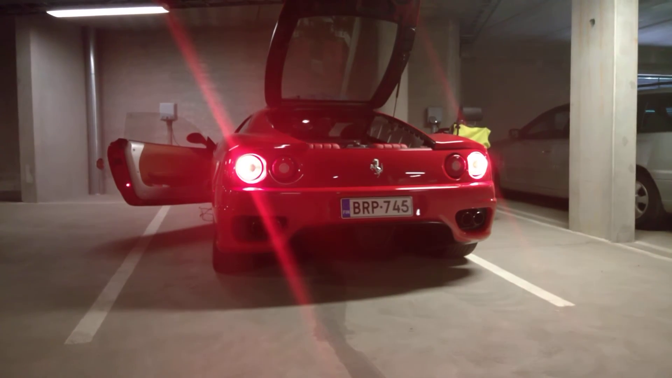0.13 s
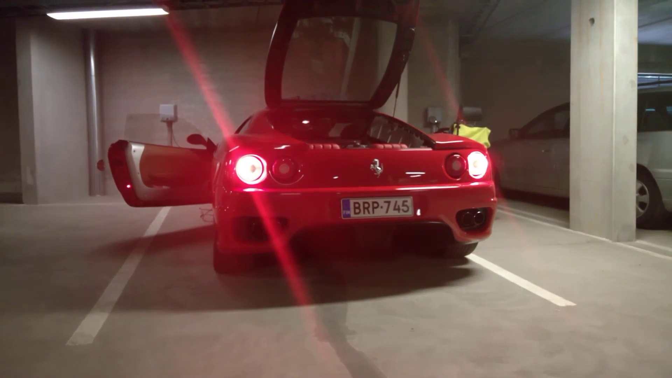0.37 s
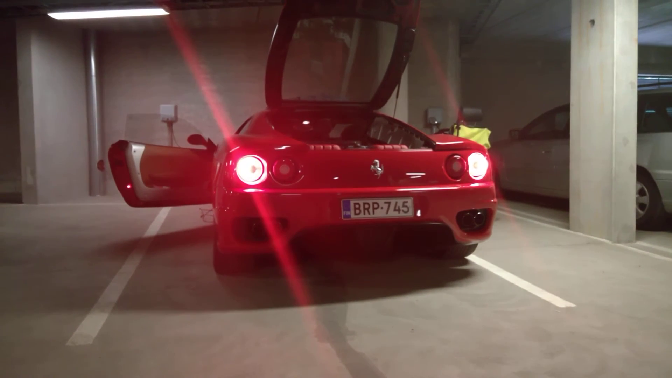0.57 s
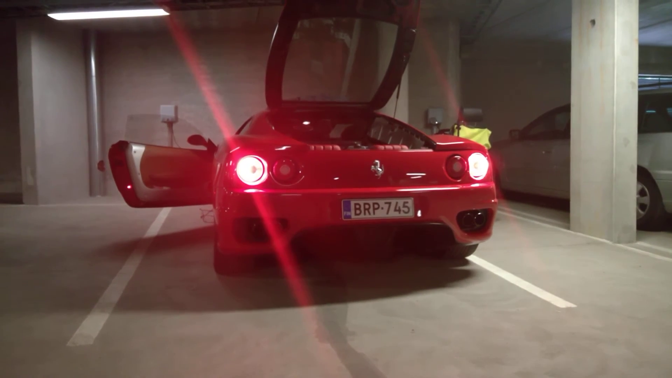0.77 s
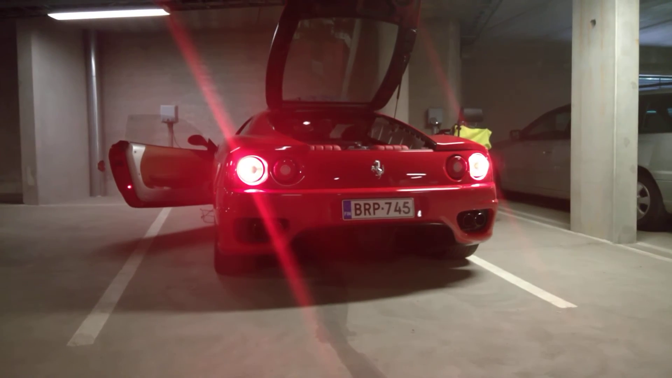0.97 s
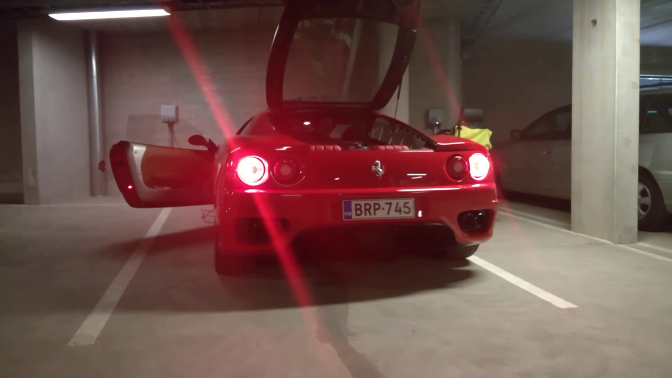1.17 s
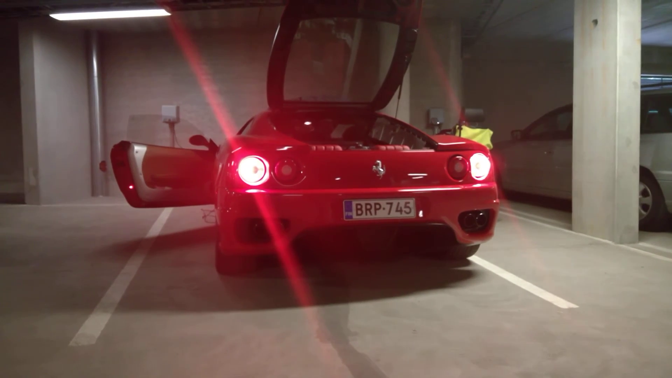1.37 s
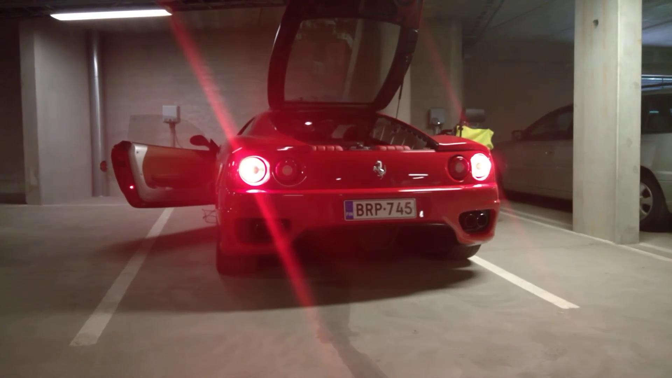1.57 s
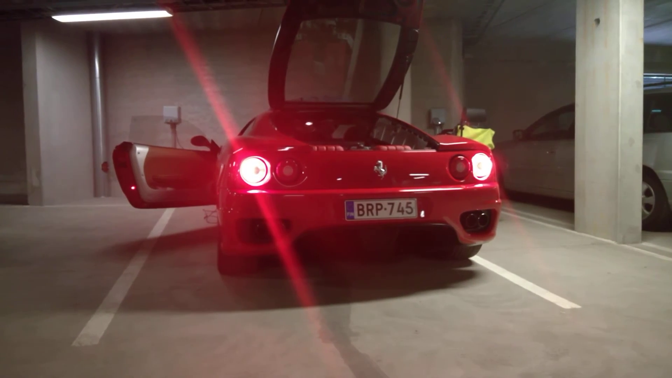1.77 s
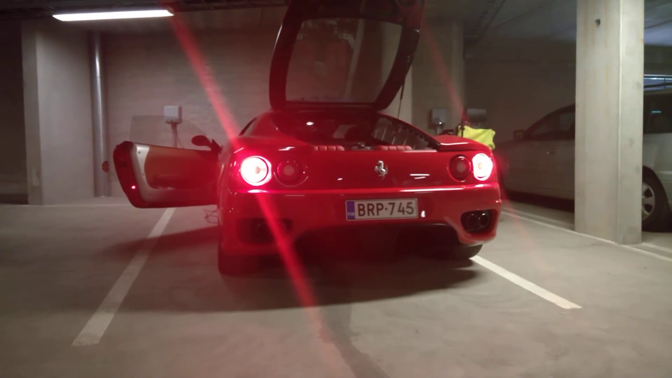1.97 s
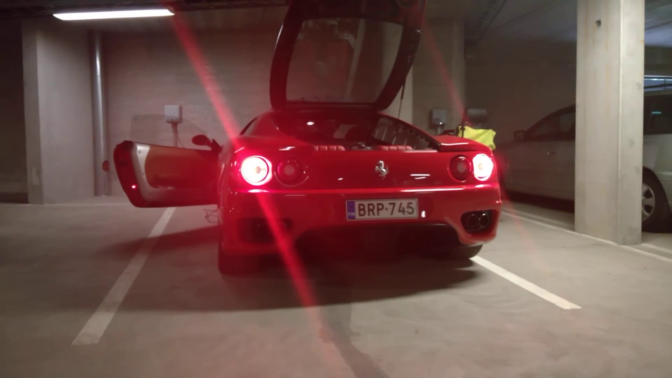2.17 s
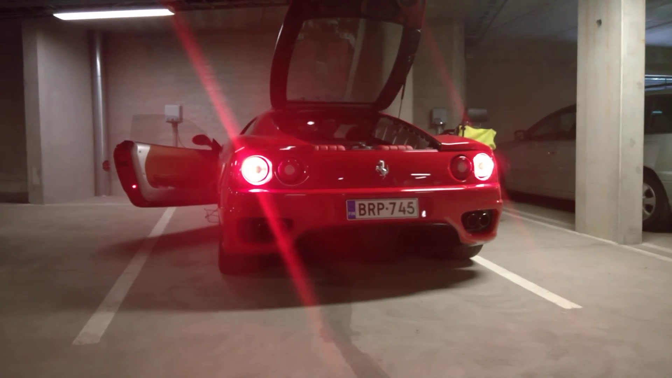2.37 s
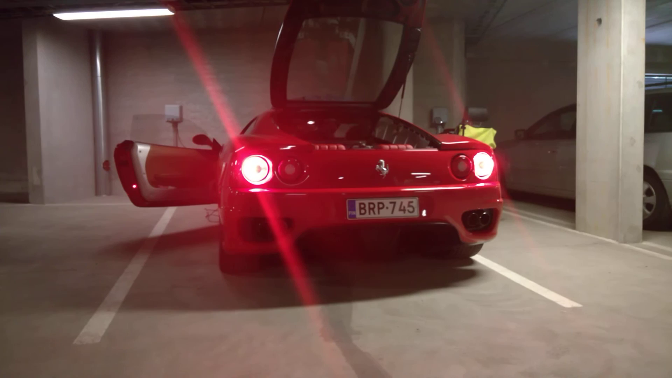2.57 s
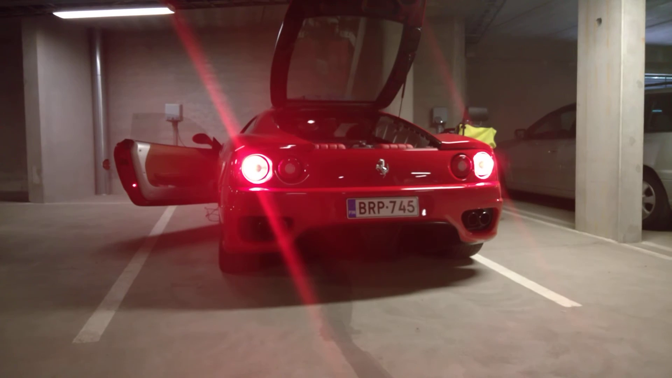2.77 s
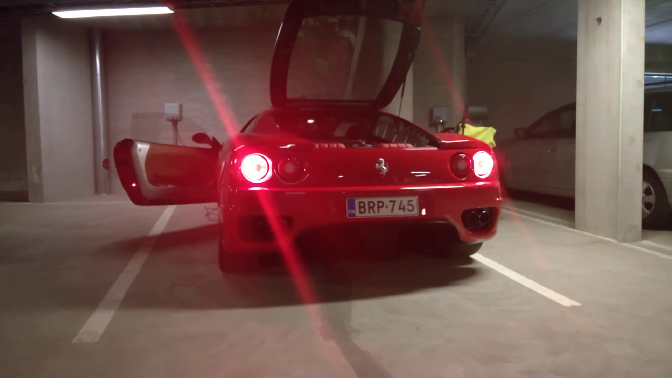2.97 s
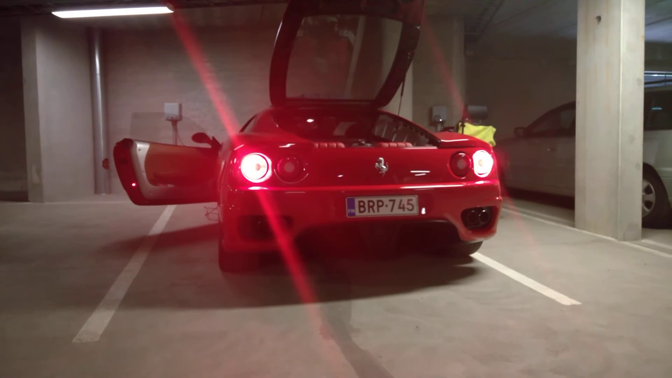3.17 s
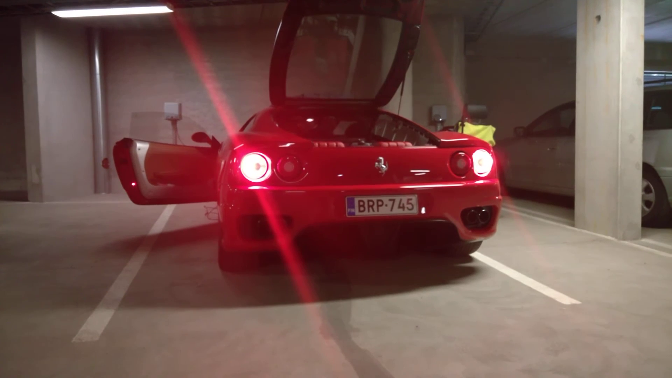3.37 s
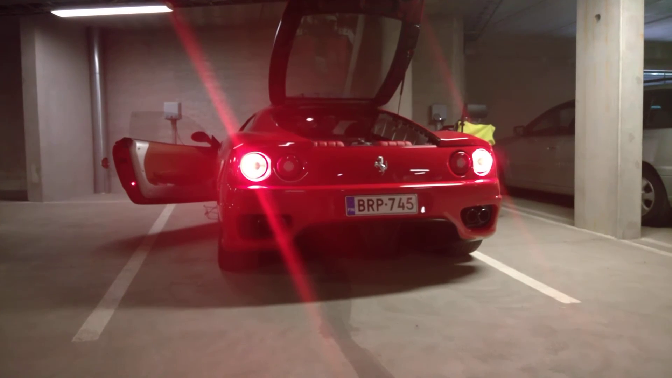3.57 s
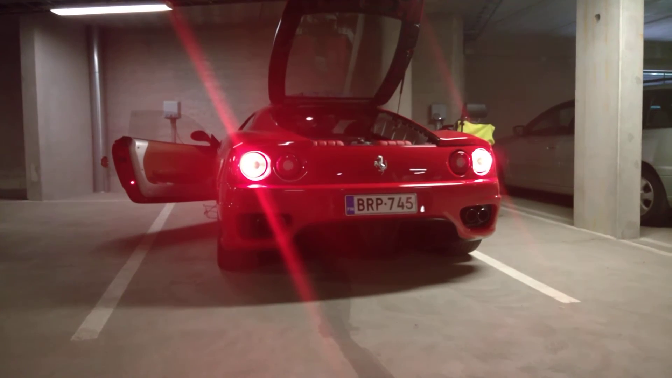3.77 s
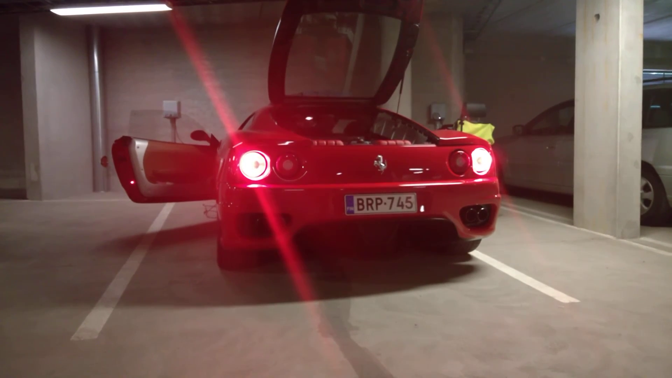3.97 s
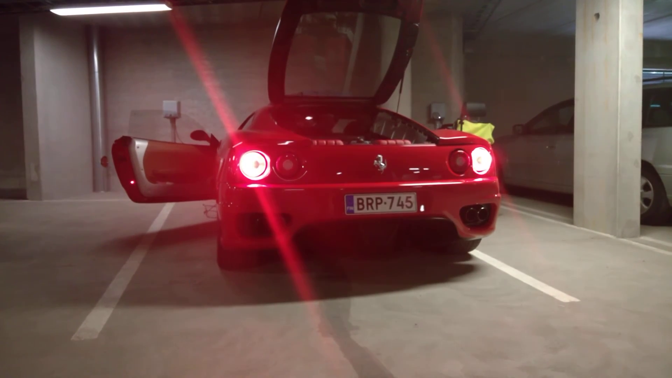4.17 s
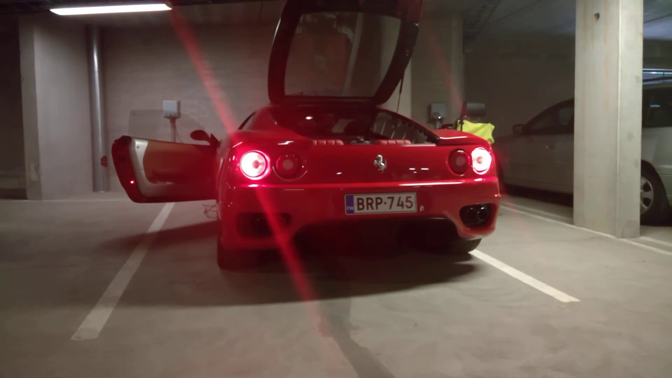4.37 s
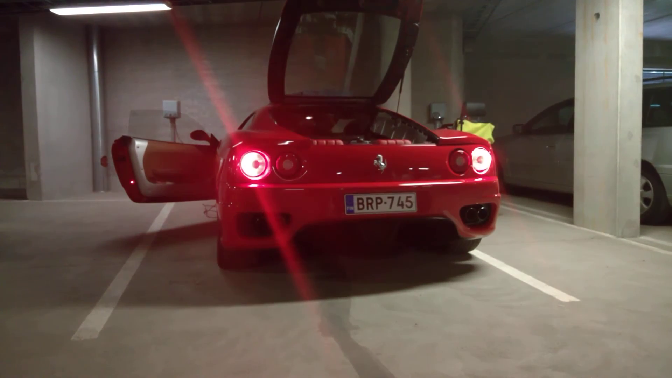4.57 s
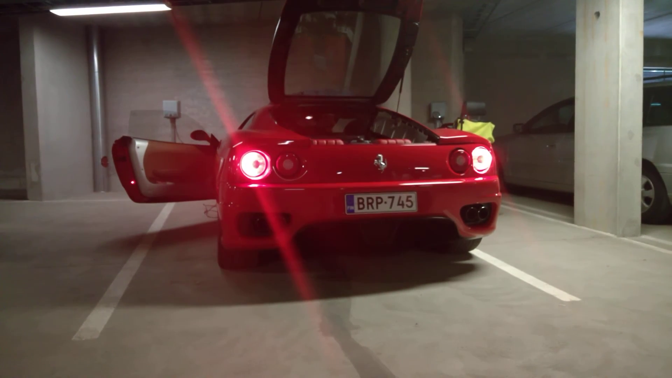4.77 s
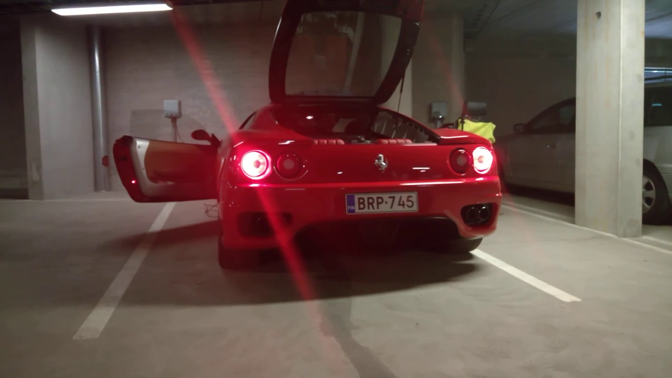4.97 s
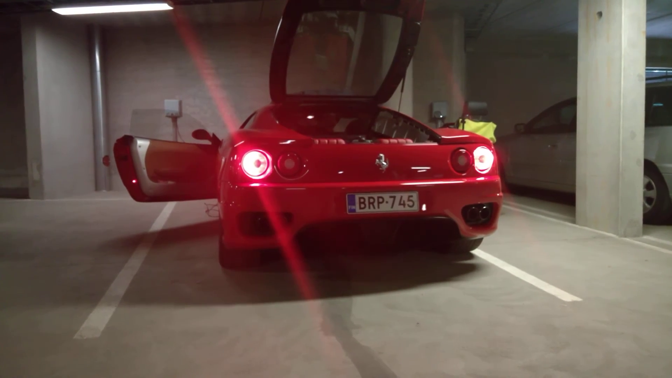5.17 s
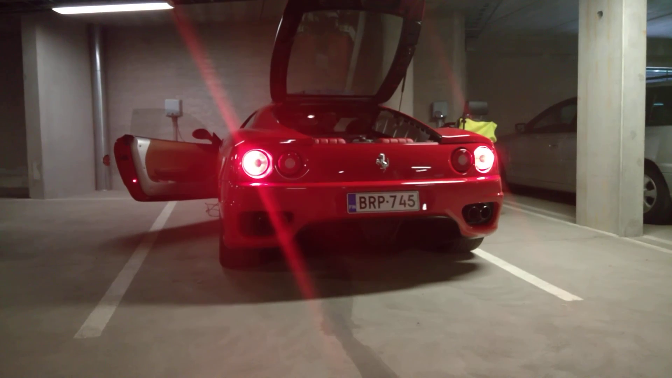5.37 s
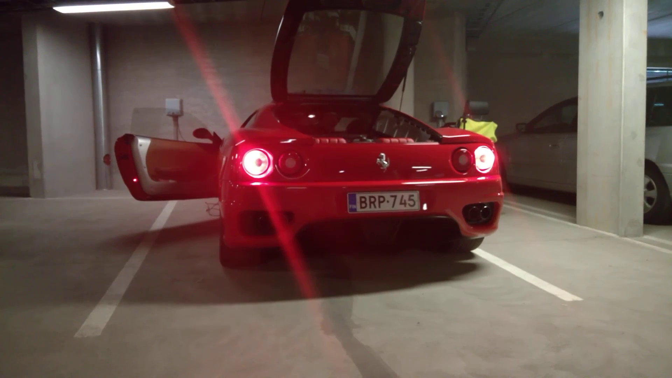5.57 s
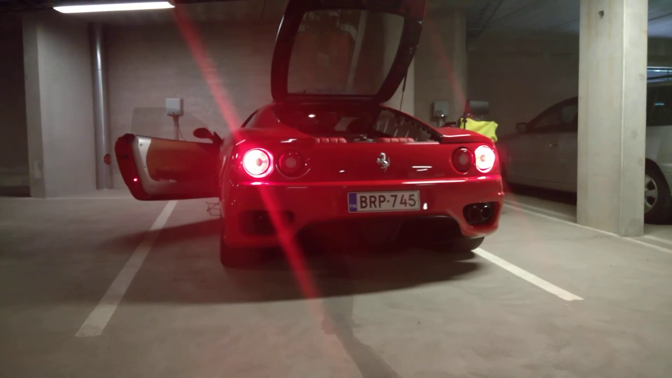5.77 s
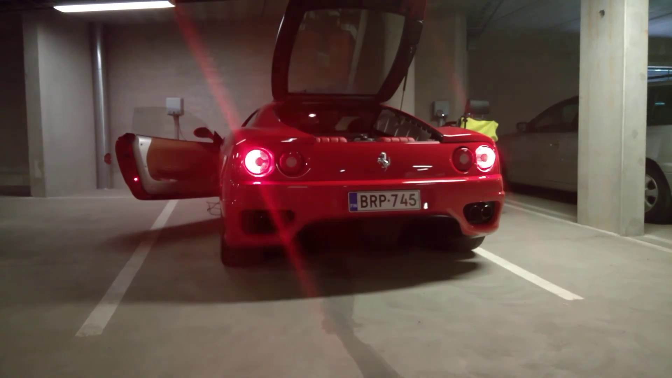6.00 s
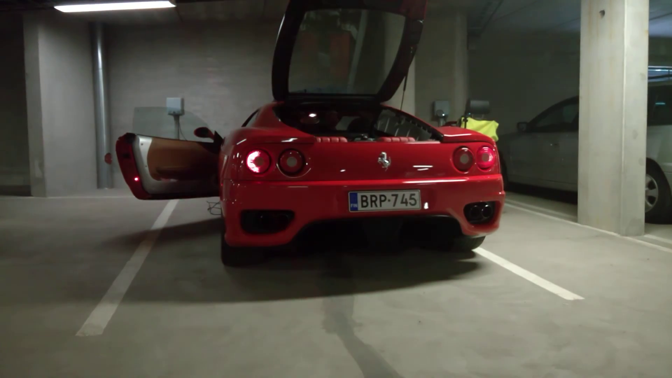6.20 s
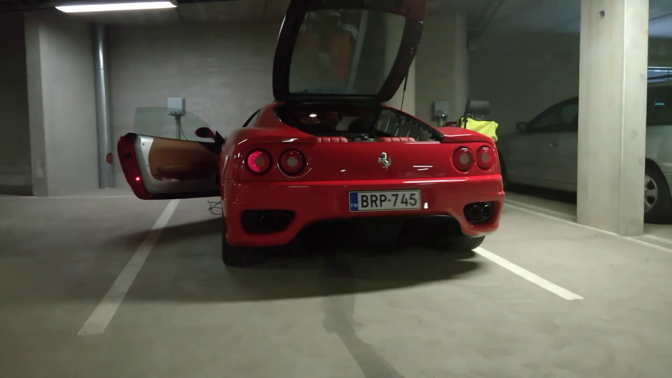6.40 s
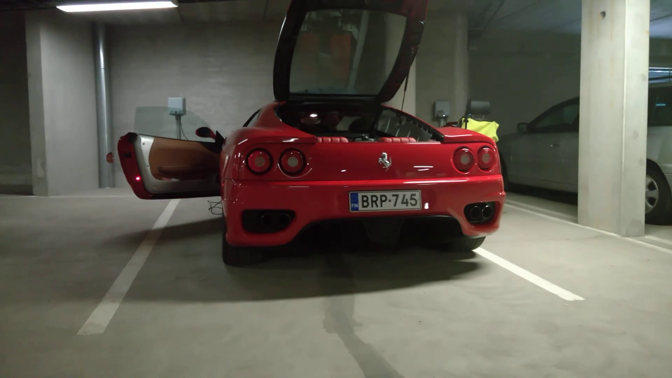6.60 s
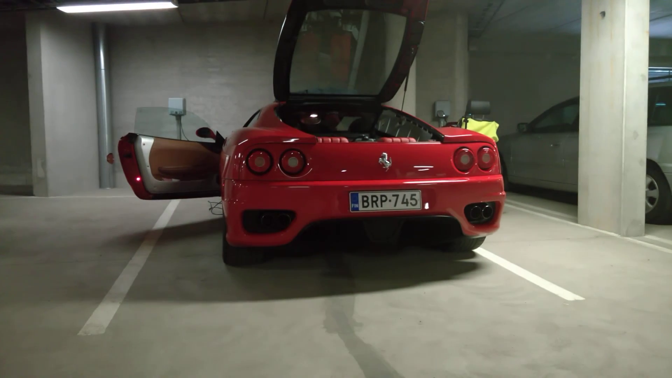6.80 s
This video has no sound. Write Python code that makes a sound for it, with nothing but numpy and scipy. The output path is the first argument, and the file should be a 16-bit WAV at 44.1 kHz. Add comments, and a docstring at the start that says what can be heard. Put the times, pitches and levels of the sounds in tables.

```python
"""Cold V8 start in a garage

A sports car is heard from a few metres behind, between concrete walls. The fuel pump buzzes and stops,
a latch clacks, and the starter grinds each time a piston squeezes its air. Then the engine catches and
flares: its firings ring the exhaust pipes while hot gas roars out of them. Ventilation rumbles
throughout, under a faint electronic whine."""
import sys
import numpy as np
from scipy import signal
from scipy.fft import rfft, irfft, next_fast_len
from scipy.io import wavfile
from scipy.ndimage import uniform_filter1d

SR = 44100
rng = np.random.default_rng(int(sys.argv[2]) if len(sys.argv) > 2 else 0)


def inscribe(sig):
    """Save sig as 16-bit PCM at rate SR to the path in sys.argv[1].

    A 1-D sig is mono; a 2-D sig holds one channel per row.
    Samples are clipped to [-1, 1] before scaling.
    """
    pcm = np.round(np.clip(np.atleast_2d(sig).T, -1, 1) * 32767)
    wavfile.write(sys.argv[1], SR, pcm.astype(np.int16))


N = 301644
T = np.arange(N) / SR

# Levels in the tables are relative.
# The engine's flare: t/s, firing rate of one bank of four cylinders/Hz, gas flow/dB
REVS = [(5.67, 24.3, -22.5), (5.714, 29.2, -23), (5.756, 38.7, -19.5), (5.822, 47.98, -18.5),
        (5.84, 51.5, -16.5), (5.88, 58.8, -15.5), (5.92, 64.6, -22), (5.988, 69.23, -18.5),
        (6.076, 71.28, -18.5), (6.2, 73.09, -16), (6.266, 71, -18), (6.334, 69.3, -23), (6.484, 66.3, -20),
        (6.54, 65, -20), (6.664, 62, -21), (6.728, 57.7, -20.5), (6.84, 53.8, -21.5)]
# The eight cylinders, in firing order: level/dB
CYLINDER_DB = [0.55, -4, 0.11, -0.038, 0.026, 0.7, -0.31, 1]
# Exhaust resonances rung by the firings: f/Hz, width/Hz, level/dB
EXHAUST_MODES = [(151, 35, -9), (204, 6.4, 9), (254, 43, 11.5), (357, 50, 14), (429.3, 30, 17.5),
                 (580, 45, -10), (692, 43, 0), (840, 63, -20), (1150, 89, -30), (2050, 220, -41)]
# Clean engine tones: multiple of the bank rate, level/dB, swell/(dB per s)
ENGINE_TONES = [(2, -21, 6.5), (4, -18, -0.5), (5, -21.5, 1.5), (6, -19.5, 3), (8, -18.5, 11.5),
                (9, -19, 5)]
# Standing waves of the pipes and garage: f/Hz, width/Hz, level/dB
STANDING_WAVES = [(101, 25, -2), (140, 17, 3), (192, 20, 7), (260, 17, 7), (278.7, 12, 9), (309, 7, 5),
                  (363, 24, 0.5), (384, 19, 9), (420.4, 12, 4.5), (437, 15, 5.5), (536, 47, -7),
                  (605, 24, -3), (643, 34, -3.5)]
# Rushing gas: f/Hz, level/dB
GAS_SPECTRUM = [(290, -2), (500, 5.5), (716, -2), (1170, 2.5), (1330, -1), (2100, -10), (2360, -7.5),
                (3630, -12), (6740, -19), (9370, -18.5), (15500, -22.5)]
# Tailpipe resonances rung by the gas: f/Hz, width/Hz, level/dB
TAILPIPE_MODES = [(800, 67, -1), (1117, 91, 3.5), (2110, 29, 5.5), (2470, 100, -30)]
# Swells of high hiss in the flare: t/s, rise/s, decay/s, level/dB
HISS_SWELLS = [(5.82, 0.037, 0.33, -19), (6.06, 0.13, 0.22, -25)]
# Piston strokes that load the starter: t/s, level/dB, hold/s, clank/dB, chug/dB
COMPRESSIONS = [(4.303, -1, .036, -2.5, -55), (4.357, -4, 0.054, 2, -50), (4.421, 1.5, 0.023, -5.5, -33),
                (4.486, -3, 0.082, -4, -32), (4.587, -1.5, 0.032, -7, -27.5), (4.617, 0.5, 0.02, -0.5, -28),
                (4.707, 0.5, .035, -2.5, -28), (4.811, -1, 0.04, 0, -34), (4.905, -2, 0.049, 4.5, -36),
                (5.009, -0.5, 0.039, -1.5, -45), (5.116, -1, 0.049, 2.5, -47),
                (5.245, 0.5, 0.011, 3.5, -26), (5.316, 0.5, 0.023, 5, -19.5), (5.412, -0.5, 0.011, -1, -19),
                (5.493, 2, 0.011, 2.5, -21), (5.58, 2, 0.014, 2, -27), (5.634, -5, 0.041, -18, -18)]
# Resonances of the starter housing: f/Hz, width/Hz, level/dB
HOUSING_MODES = [(484, 70, -7), (900, 200, -3), (1290, 150, 0), (2030, 120, -5), (2640, 160, -3),
                 (3150, 350, -2), (3710, 160, -3), (4320, 200, -12), (5300, 300, -13), (7300, 500, -20)]
# Grinding gears: f/Hz, level/dB
GRIND_SPECTRUM = [(24, -36), (40, -5), (80, -12.5), (273, -19), (472, -13), (704, -9.5), (778, -10.5),
                  (998, -2), (1310, -12.5), (1560, -5.5), (3220, -5.5), (5860, -22), (15500, -20.5)]
# The starter's small gear biting: t/s, tooth rate/Hz, level/dB
PINION_BITE = [(4.33, 970, -19), (4.354, 810, -27), (4.372, 950, -23), (4.46, 995, -19.5),
               (4.534, 806, -10.5), (4.564, 830, -30), (4.634, 1100, -30), (4.662, 890, -12),
               (4.69, 870, -59)]
# Housing resonances that sing during the bite: f/Hz, width/Hz, level/dB
SHRIEK_MODES = [(2640, 90, -2), (3250, 120, -2), (4320, 200, -14)]
# Fuel pump buzz: multiple of its pitch, level/dB
PUMP_HARMONICS = [(1, -5), (5, -16), (6, -15), (7, -14), (8, -16), (9, -19), (10, -21), (11, -17),
                  (12, -20), (13, -21), (14, -22), (15, -20), (16, -17), (17, -20)]
# Blows of the latch: t/s, level/dB, decay/s, body f/Hz
LATCH_BLOWS = [(2.174, -22, 0.16, 1220), (2.187, -19, .081, 800), (2.212, -34, 0.13, 900),
               (2.236, -24.5, 0.17, 1690)]
# Resonances of the latch: f/Hz, width/Hz, level/dB
LATCH_MODES = [(145, 40, -13), (400, 60, -9), (560, 80, -4), (1152, 25, -14), (1427, 16, -2), (1560, 30, 8),
               (1566, 3, 10), (2051, 40, -10), (2640, 60, -13), (4400, 500, -16)]
# Small knocks about the car: t/s, level/dB, decay/s, body f/Hz, treble/dB
KNOCKS = [(.85, -40, 0.39, 476, -61), (1.724, -53, .03, 1500, -58), (1.834, -42, 0.084, 1250, -75),
          (1.85, -34.5, 0.26, 327, -80), (2.59, -41, .03, 2000, -46), (3.03, -53, .08, 1500, -68),
          (4.226, -52, 0.82, 2490, -55.5)]
# Ventilation noise: f/Hz, level/dB
VENT_SPECTRUM = [(15, -45), (25, -13.5), (122, -7), (297, -9), (389, -3.5), (421, -14), (469, -3.5),
                 (631, -12.5), (703, -11.5), (1950, -21.5), (4040, -28), (4870, -48.5), (6210, -26.5),
                 (6730, -36.5), (15500, -38.5)]
# Low background rumble, swelling as the latch's boom lingers in the garage: t/s, level/dB
RUMBLE_LEVEL = [(0, -52), (.68, -50.5), (1.3, -54), (2.2, -51), (2.63, -47.5), (2.9, -52), (3.56, -53.5),
                (4.3, -51.5)]
# Thin electronic tones: f/Hz, level/dB
WHINE_TONES = [(4005, -80.5), (6013, -71.5), (8016, -100), (10018, -87), (12021, -87), (14023, -95)]
# Garage echo: f/Hz, decay/s, level/dB
ECHO_BANDS = [(168, 6.1, -9.5), (386, 1.52, 1.5), (910, 2, -1), (2240, 2.38, -2.5), (5030, 1.67, -2.5),
              (8500, 1.05, -0.5)]
# How alike left and right stay: f/Hz, likeness (1 = the same)
STEREO_LIKENESS = [(60, 0.99), (130, 1), (290, 0.96), (640, 0.98), (1410, 0.89), (3100, 0.6), (6820, 0.27),
                   (15000, -0.04)]
# Balance of the two sides: f/Hz, left minus right/dB
STEREO_TILT = [(200, -.5), (300, -1.5), (700, -.3), (2000, -2), (4500, -.5), (8000, 1.5), (13000, -1)]


def engine():
    """Two cylinder banks fire in turn; one pipe is longer, so its pulses come late."""
    bank_lag_s, scatter_db, pipe_fill_s = 0.00086, 2, 0.059
    bank_hz, gas_db = curves(REVS)
    age = T - REVS[0][0]
    running = age > 0
    firings = np.cumsum(2 * bank_hz * running) / SR + .72  # firings counted so far
    k = np.arange(400)
    size_noise, time_noise = rng.standard_normal((400, 2)).T
    strength = undb(np.array(CYLINDER_DB)[k % 8] + scatter_db * size_noise)
    late = k % 2 * bank_lag_s * np.interp(k, firings, 2 * bank_hz)
    shots = pulses(firings, strength, slip=.009 * time_noise + late)
    tones = engine_tones(firings, bank_hz, age)
    pipes = undb(-19) * np.clip(age / pipe_fill_s, 0, 1) * steady(ring(shots, EXHAUST_MODES))
    puffs = 0.63 + strength[firings.astype(int)] * np.exp(-(firings % 1) / 2.4)
    blast = cut(running * (pipes + gas_rush(puffs, gas_db, running)), "high", 75)
    thud = steady(ring(uniform_filter1d(shots, size=80), [(190, 200, 0.015)]))
    thud_db = -13 - 70 * np.clip(age - .1, 0, .4)  # the first slow firings thump into empty pipes
    return blast + running * undb(thud_db) * thud + tones


def engine_tones(firings, bank_hz, age):
    """Harmonics of the firing beat swell as they sweep through standing waves."""
    tones = 0
    for multiple, db, swell in ENGINE_TONES:
        hz = multiple * bank_hz
        power = sum(undb(g) ** 2 / (1 + (2 * (hz - f) / width) ** 2) for f, width, g in STANDING_WAVES)
        uneven_db = 1.7 * wander(35)  # a cold engine burns unevenly
        gain = undb(db + swell * (age - 0.76) + 10 * np.log10(power) + uneven_db)
        tones += gain * np.sin(np.pi * multiple * firings + multiple ** 2)
    return gate(REVS, fade_s=0.079) * tones


def gas_rush(puffs, gas_db, running):
    """Gas puffs out of the tailpipe; the rasp grows faster than the flow, the hiss more slowly."""
    gas = level(running * colour(puffs * rng.standard_normal(N), GAS_SPECTRUM), 2.64)
    low, high = cut(gas, "low", 4000, order=1), cut(gas, "high", 4000, order=1)
    roar = undb(gas_db - 6.5) * (0.55 * low + 1.35 * ring(low, TAILPIPE_MODES))
    rasp = undb(-27.5 + 2.32 * (gas_db + 20)) * ring(gas, [(1880, 310, 0), (2670, 320, 3.5)])
    hiss = undb(-29.5 + 0.47 * (gas_db + 21.5)) * high
    swells = sum(undb(db) * strike(s, rise, t60) for s, rise, t60, db in HISS_SWELLS)
    return roar + rasp + hiss + swells * ring(high, [(10100, 4200, 0)])


def starter():
    """Each piston stroke loads the gears quickly and lets go slowly; loose teeth rattle the housing."""
    rise_s, fall_db_per_s = .014, 208
    envelopes = np.zeros((4, N))
    for s, db, hold, clank_db, chug_db in COMPRESSIONS:
        fade_db = fall_db_per_s * np.clip(T - s - hold, 0, 1)
        load = np.clip((T - s) / rise_s, 0, 1) * undb(db - fade_db)
        clank = load * undb(clank_db - np.minimum(0.13 * fade_db, 6.5))  # dies sooner than the grind
        sizzle = load * undb(-0.26 + 0.13 * np.minimum(fade_db, 25))  # spins on between strokes
        envelopes = np.maximum(envelopes, [load, clank, sizzle, load * undb(chug_db)])
    load, clank, sizzle, chug = envelopes
    rattle = rng.standard_normal(N) * undb(2.43 * rng.exponential(size=N))
    housing = sum(undb(3.5 * wander(20)) * ring(rattle, [mode]) for mode in HOUSING_MODES)
    grind = level(housing, -3) + level(colour(rattle, GRIND_SPECTRUM), -6.5)
    low, high = cut(grind, "low", 1600), cut(grind, "high", 5200)
    breath = level(ring(rng.standard_normal(N), [(84, 25, 0)]), 5.3)  # unburnt charge in the pipes
    cranking = load * (grind - low - high) + sizzle * high + clank * low + chug * breath
    return undb(-12) * cranking + pinion(rattle)


def pinion(rattle):
    """The starter's small gear whines as its teeth mesh, and the housing shrieks along."""
    hz, db = curves(PINION_BITE)
    phase = 2 * np.pi * np.cumsum(hz * (1 + .015 * wander(150))) / SR
    teeth = sum(gain * np.sin(m * phase) for m, gain in enumerate([1, .6, 0.13, 0.49], 1))
    whine = undb(db + 2.85 * wander(80)) * teeth
    shriek = undb(db + 2.8 * wander(30.1)) * level(ring(rattle, SHRIEK_MODES), -4)
    return gate(PINION_BITE, fade_s=0.03) * (whine + shriek)


def fuel_pump():
    """Brushes buzz over a small motor's nine contact bars; it slows as fuel pressure builds."""
    base_hz, sag_hz, sag_s, stop_s = 906, 32.1, 0.68, .86
    hz = base_hz + sag_hz * np.exp(-T / sag_s)
    phase = 2 * np.pi * np.cumsum(hz * (1 + 0.001 * wander(46.7))) / SR
    buzz = sum(undb(db + 0.98 * wander(15.7) + 3 * wander(2.1)) * np.sin(m * phase)
               for m, db in PUMP_HARMONICS)
    shaft = sum(gain * np.sin(phase * m / 9) for m, gain in [(8, 0.63), (17, 0.29), (19, 0.19)])
    brushes = ring(rng.standard_normal(N), [(910, 220, 5), (2800, 4600, -5.5), (11000, 22000, -18)])
    rising = undb(-69.5 + 20.5 * T) * np.sin(2 * phase)
    fading = undb(-57 - 19 * T) * np.sin(4 * phase)
    running = np.clip((stop_s - T) / 0.0072, 0, 1)
    return running * (undb(-51) * (buzz + shaft + level(brushes, -4.5)) + rising + fading)


def clacks():
    """The latch and small knocks: short scraping blows with a dull body, a crack and a metal ring."""
    dull, crack_shape, ring_shape = np.zeros((3, N))
    body_noise, crack_noise, ring_noise = rng.standard_normal((3, N))
    # Hits have the columns of KNOCKS, then rise/s and ring/dB. Longer knocks start softer.
    hits = [(*blow, -41.5, .012, -5) for blow in LATCH_BLOWS]
    hits += [(*knock, min(0.089 * knock[2], 0.0084), -33) for knock in KNOCKS]
    for s, db, t60, body_hz, treble_db, rise, ring_db in hits:
        shape = strike(s, rise, t60)
        dull += ring(shape * body_noise, [(body_hz, 1.21 * body_hz, db)])
        crack_shape += undb(treble_db) * shape
        ring_shape += undb(db + ring_db) * shape
    metal = ring(ring_shape * ring_noise, LATCH_MODES)
    body = cut(undb(16.5) * metal + undb(6.5) * dull, "low", 5000)
    return body + cut(crack_shape * crack_noise, "high", 4000)


def garage_echo(x):
    """Dense echoes off concrete build up within a few milliseconds; the bass lasts longest."""
    t = T[:2 * SR]
    echo = 0
    for hz, t60, db in ECHO_BANDS:
        band = cut(rng.standard_normal((2, len(t))), "band", [hz / 1.53, hz * 1.51])
        echo += undb(db - 60 * t / t60) * band
    echo *= np.clip(t / 0.0063, 0, 1)
    return signal.fftconvolve(x[None], echo / np.linalg.norm(echo[0]), axes=1)[:, :N]


def background():
    """Ventilation, distant town and a faint duct hiss; the low rumble swells after the latch."""
    mid, side = (level(colour(rng.standard_normal(N), VENT_SPECTRUM), 0) for _ in range(2))
    side = cut(side, "high", 1500, order=1)  # the bass sits in the centre
    mid, side = (x + level(ring(rng.standard_normal(N), [(3050, 680, 0)]), -10) for x in (mid, side))
    air = mid + 1.16 * side * np.array([[1], [-1]])
    rumble = cut(air, "low", 1300)
    return undb(curves(RUMBLE_LEVEL)[0] + 1.3 * wander(14)) * rumble + undb(-57) * (air - rumble)


def electronic_whine():
    """Electronics give off faint high tones that waver in loudness."""
    return sum(undb(db + 5.5 + 1.5 * wander(3)) * np.sin(2 * np.pi * hz * T) for hz, db in WHINE_TONES)


def stereo_spread(x):
    """Sound scatters off pillars and cars; the two sides are alike in the bass, unlike in the treble."""
    size = next_fast_len(N + SR // 2)
    likeness = np.clip(over_hz(STEREO_LIKENESS, size), 0, 1)
    mid, side = rfft(x[0] + x[1], size) / 2, rfft(x[0] - x[1], size) / 2
    scatter = undb(-60 * T[:14000] / .3) * rng.standard_normal(14000)
    scattered = mid * rfft(scatter / np.linalg.norm(scatter), size)
    side = np.sqrt(1 - likeness) * (side + 0.94 * scattered)
    tilt = undb(over_hz(STEREO_TILT, size) / 2)
    return np.array([irfft((mid + side) * tilt, size), irfft((mid - side) / tilt, size)])[:, :N]


def undb(db):
    """Turn decibels into a gain."""
    return 10 ** (np.asarray(db) / 20)


def level(x, db):
    """Set the average (rms) level."""
    return x * undb(db) / np.sqrt(np.mean(x ** 2))


def steady(x):
    """Even out the loudness over time."""
    return x / np.sqrt(uniform_filter1d(x ** 2, int(.09 * SR)) + 1e-9)


def curves(table):
    """Draw each column as a line over time."""
    times, *columns = np.transpose(table)
    return [np.interp(T, times, column) for column in columns]


def gate(table, fade_s):
    """Fade in at a table's first time and out after its last."""
    return np.clip(np.minimum(T - table[0][0], table[-1][0] + fade_s - T) / fade_s, 0, 1)


def strike(start, rise, t60):
    """Rise in a straight line, then fade by 60 dB in t60 seconds."""
    t = np.clip(T - start, 0, 1)
    return undb(-60 * np.clip(t - rise, 0, 1) / t60) * np.clip(t / rise, 0, 1)


def wander(rate):
    """A smooth random curve with `rate` new values a second."""
    hold = int(SR / rate)
    steps = np.repeat(rng.standard_normal(N // hold + 1), hold)
    return 1.6 * uniform_filter1d(uniform_filter1d(steps, hold), hold)[:N]


def pulses(count, strength, slip):
    """One pulse at each whole count, moved by `slip` and shared between two samples."""
    k = np.arange(1, int(count[-1]))
    at = np.interp(k + slip[k], count, np.arange(N))
    out, i = np.zeros(N + 1), at.astype(int)
    np.add.at(out, i, strength[k] * (i + 1 - at))
    np.add.at(out, i + 1, strength[k] * (at - i))
    return out[:N]


def over_hz(table, size=N):
    """Draw a table as a line over frequency."""
    hz, value = np.transpose(table)
    return np.interp(np.log(np.fft.rfftfreq(size, 1 / SR) + 1), np.log(hz), value)


def colour(x, spectrum):
    """Shape a sound with a spectrum table."""
    return irfft(rfft(x) * undb(over_hz(spectrum)), N)


def cut(x, keep, hz, order=2):
    """Keep the "low", "high" or "band" part of a sound."""
    return signal.sosfilt(signal.butter(order, hz, keep, fs=SR, output="sos"), x)


def ring(x, modes):
    """Add up resonances (f/Hz, width/Hz, level/dB), neighbours with opposite signs."""
    return sum((-1) ** k * undb(db) * signal.lfilter(*signal.iirpeak(hz, hz / width, SR), x)
               for k, (hz, width, db) in enumerate(modes))


def scene():
    """The car and its echo, over the background."""
    motor, crank, knocks, pump = engine(), starter(), clacks(), fuel_pump()
    echo = garage_echo(undb(-4.5) * motor + undb(-10.5) * crank + undb(-7) * knocks + undb(-8.5) * pump)
    whine = electronic_whine()
    return stereo_spread(motor + crank + knocks + pump + echo) + background() + whine


def record(dry):
    """Round off the loudest peaks and cut the highest treble."""
    top_hz = 15741
    rounded = np.tanh(0.89 * dry) / 0.96
    return signal.sosfilt(signal.ellip(14, .2, 85, top_hz, fs=SR, output="sos"), rounded)


dry = scene()
out = record(dry)
inscribe(out)
```